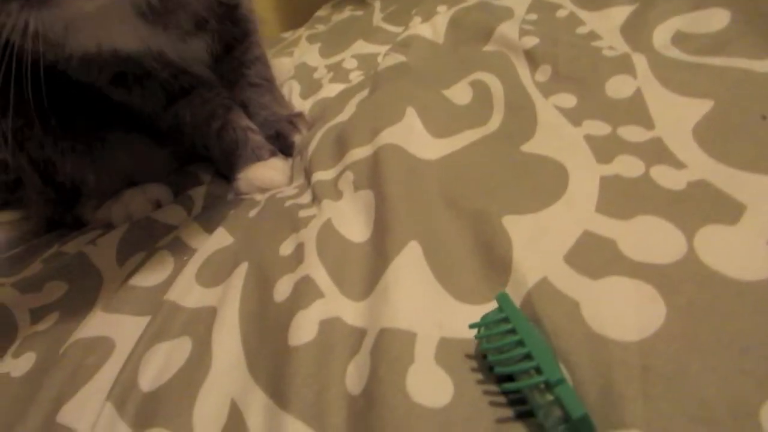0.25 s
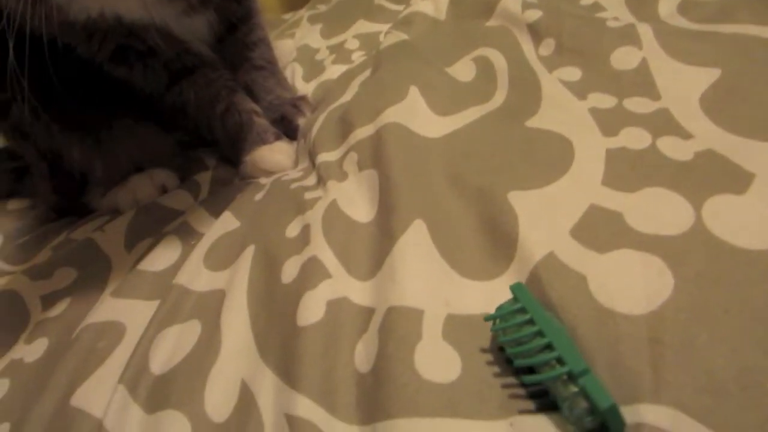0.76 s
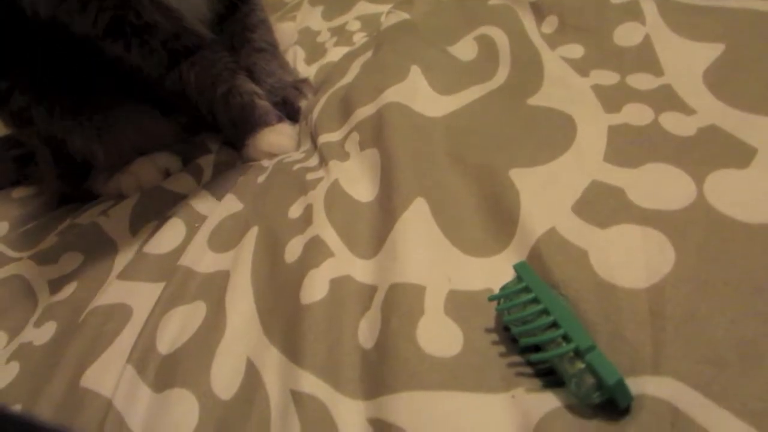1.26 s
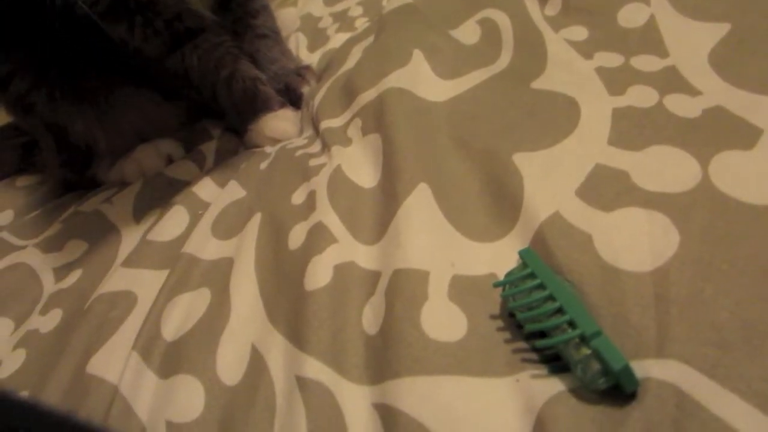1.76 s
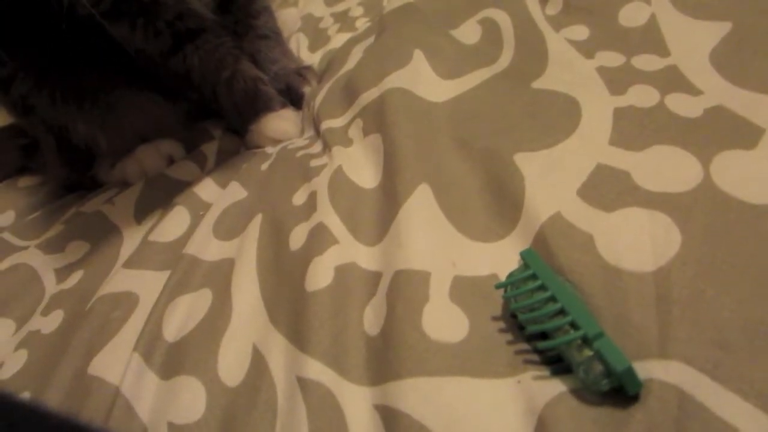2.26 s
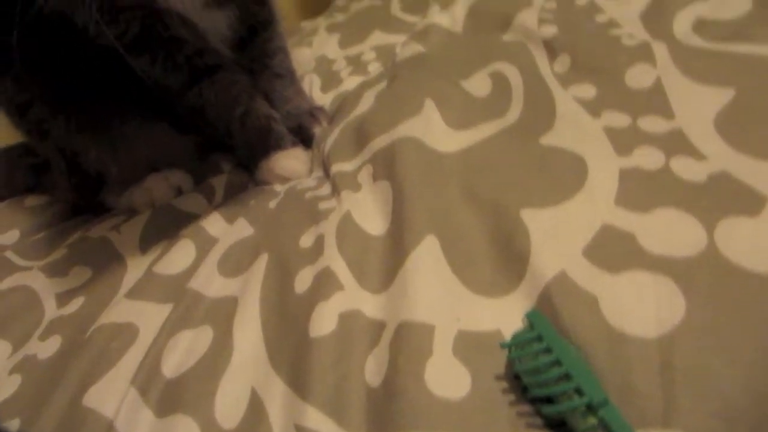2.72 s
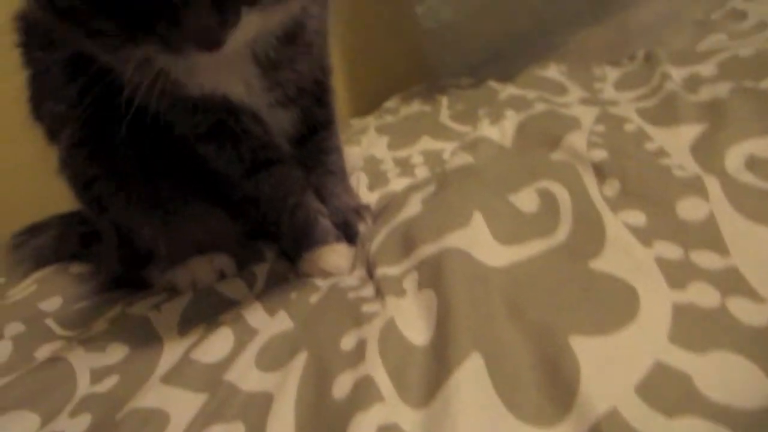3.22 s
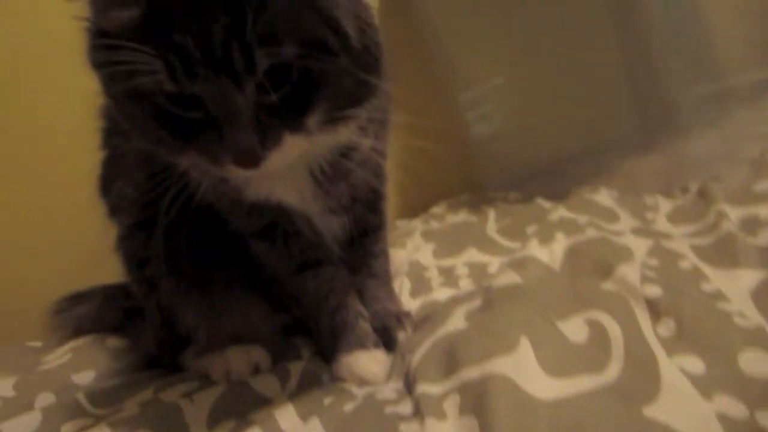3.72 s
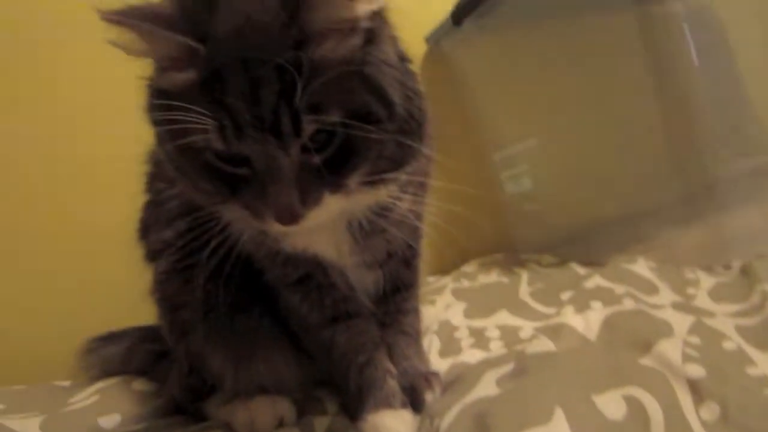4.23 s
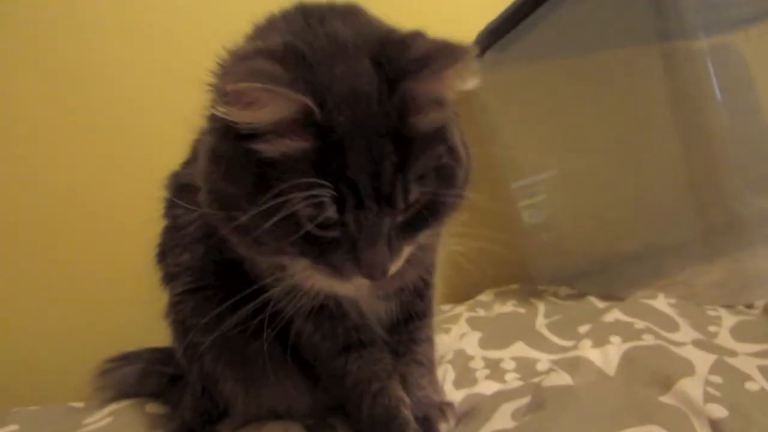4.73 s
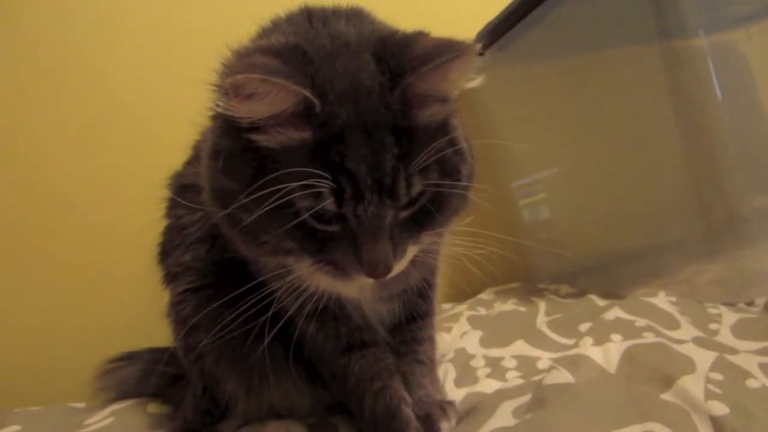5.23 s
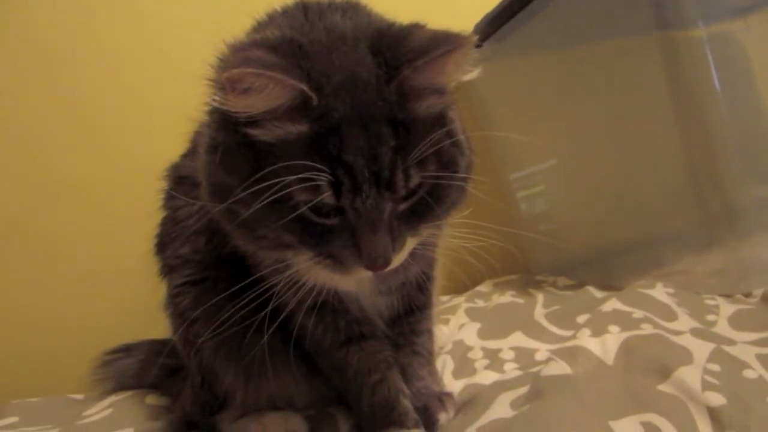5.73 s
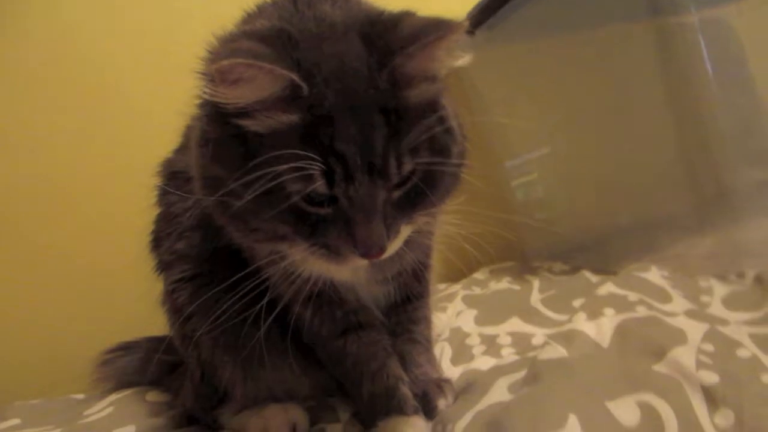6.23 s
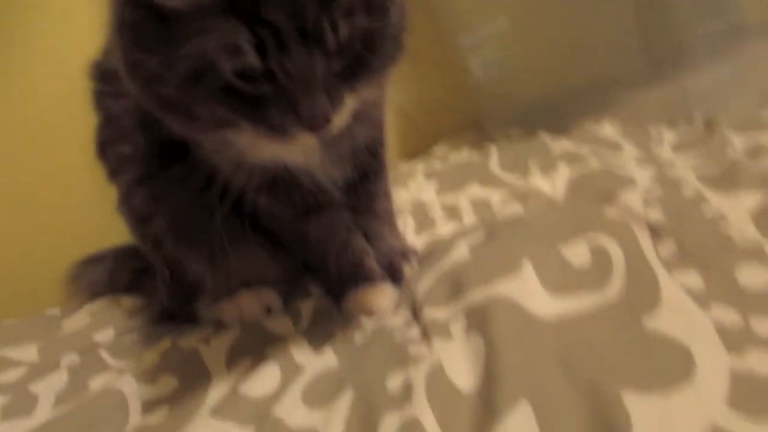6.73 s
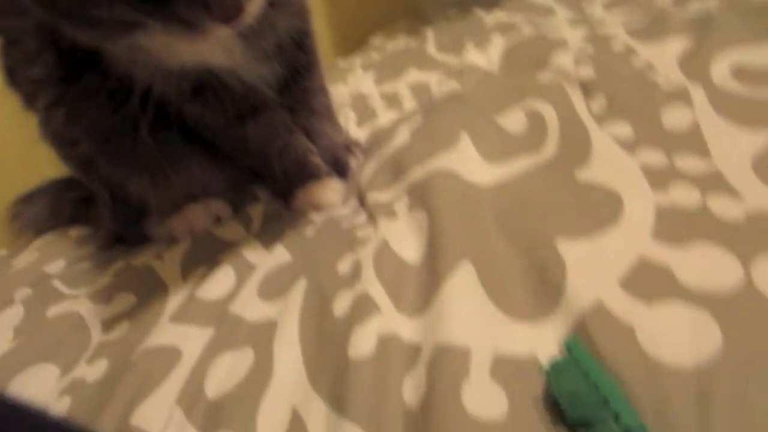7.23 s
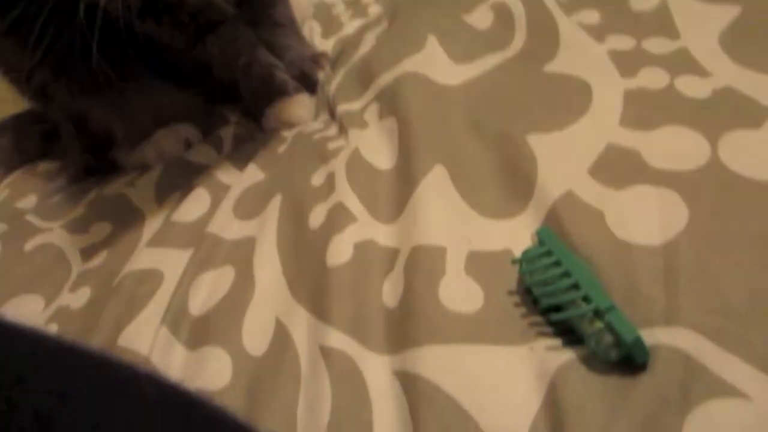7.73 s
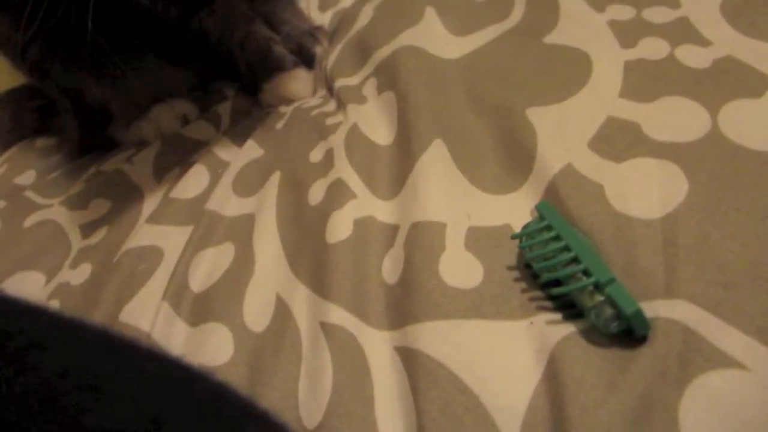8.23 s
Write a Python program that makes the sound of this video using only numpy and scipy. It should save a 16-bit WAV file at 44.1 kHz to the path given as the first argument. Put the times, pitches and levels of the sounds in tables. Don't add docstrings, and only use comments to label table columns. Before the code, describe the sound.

A small toy's vibration motor buzzes steadily on a soft bed, low and rattly, sagging slightly in pitch, with tiny camera handling clicks and thuds.

```python
import sys
import numpy as np
from scipy import signal
from scipy.fft import rfft, irfft, next_fast_len
from scipy.io import wavfile
from scipy.ndimage import map_coordinates

SR = 44100
rng = np.random.default_rng(int(sys.argv[2]) if len(sys.argv) > 2 else 0)


def to_wav(sig):
    pcm = np.clip(np.atleast_2d(sig), -1, 1) * 32767
    pcm = np.round(pcm).astype(np.int16)
    wavfile.write(sys.argv[1], SR, pcm.T)


def gain_from_db(level_db):
    decades = np.asarray(level_db, float) / 20
    return 10 ** decades


N = 373526
TIME_S = np.arange(N) / SR


def unit(x):
    return x / np.sqrt(np.mean(x ** 2) + 1e-20)


def hump(x, centre, width, height):
    return height * np.exp(-((x - centre) / width) ** 2)


def along(points, hz):
    f, v = np.transpose(points)
    return np.interp(np.log(hz + 1), np.log(f + 1), v)


def curves(rows):
    s, *columns = np.transpose(rows)
    return [np.interp(TIME_S, s, column) for column in columns]


def wobble(rate):
    knots = rng.standard_normal(int(N * rate / SR) + 4)
    return map_coordinates(knots, [np.arange(N) * rate / SR], order=1)


def filtered(x, response):
    n = x.shape[-1]
    m = next_fast_len(n + 8192)
    return irfft(rfft(x, m) * response(np.fft.rfftfreq(m, 1 / SR)), m)[..., :n]


def shaped_noise(spectrum):
    return filtered(rng.standard_normal(N), lambda hz: gain_from_db(along(spectrum, hz)))


def ringing(modes):
    def response(f):
        total = 0
        for k, (centre, width, db) in enumerate(modes):
            total = total + (-1) ** k * gain_from_db(db) * 1j * f * width / (centre ** 2 - f * f + 1j * f * width)
        return total
    return response


def pulses(at, size):
    tap = np.floor(at)[:, None] + np.arange(-7, 9)
    offset = tap - at[:, None]
    shape = np.sinc(offset) * np.cos(np.pi * offset / 16) ** 2
    place = np.clip(tap, 0, N).astype(int)
    return np.bincount(place.ravel(), (shape * size[:, None]).ravel(), N + 1)[:N]


# pitch_hz,
# lead_rad
LEAD_FACING = [(100, 0), (700, 0.24), (2200, -0.35), (7600, -2), (9200, -2.5), (11000, -2), (12200, -1.4),
               (13500, -0.5)]
LEAD_AWAY = [(100, 0), (700, 0.54), (2200, 0.44), (5500, -0.5), (6800, -3), (8200, -2.55), (9200, -3),
             (10500, -2.5), (12400, -2.5)]
# pitch_hz, level_db
SHADE = [(100, 0.8), (500, -0.6), (1200, 2), (3000, 0.5), (8000, 0), (12000, -6.5)]


def ports(x, lead=LEAD_FACING):
    side = np.array([[0.5], [-0.5]])
    return filtered(x, lambda hz: np.exp(1j * along(lead, hz) * side) * gain_from_db(along(SHADE, hz) * side))


# time_s, shaft_hz, shake_db
MOTOR = [(0, 151.5, -30.4), (.3, 150.3, -30.9), (.54, 149.95, -30.9), (.7, 150.3, -30.2),
         (1.2, 150.05, -29), (1.52, 148.9, -28.6), (2.0, 148.95, -28.1), (2.8, 148.5, -29),
         (3.2, 147.3, -30), (3.9, 146.6, -31.4), (4.35, 145.55, -32.4), (4.9, 145.4, -32.7),
         (5.35, 144.4, -32.9), (5.75, 144.2, -32.9), (6.28, 143.05, -33), (7.35, 142.8, -30.6),
         (7.98, 145, -29.6), (8.47, 144.8, -29.7)]
# time_s, share turned away from the toy (0-1)
AIM = [(0, 0), (.6, 0.036), (1.5, 0.082), (2.7, 0.062), (3.2, 0.68), (4, 0.71), (5.4, 0.64), (6.2, 0.75),
       (6.9, 0.65), (7.3, 0.54), (8.47, 0.47)]
# time_s, extra 2nd order level_db, extra 3rd order level_db
SETTLE = [
    (0, 4, 11),
    (.2, 3.5, 7),
    (.3, 3.5, 5),
    (.4, 0.5, -1),
    (.5, 0, 2),
]
# time_s, second_rad, third_rad
LEAN = [(0, 4.1, 2.5), (.3, 4, 1.9), (.5, 3.6, .1), (.9, 3.2, .1), (3, 3.1, .1), (6.2, 2.6, -.4),
        (8.47, 2.7, -.5)]
# multiple of the shaft, level_db
UPPER = [(1, 0), (2, -9), (3, -16), (4, -35), (5, -31), (6, -31), (7, -31.5), (8, -32.5), (9, -34.5),
         (10, -33.5), (11, -40), (12, -36), (13, -37), (14, -39.5), (15, -40), (16, -39), (17, -39.5),
         (18, -46), (19, -38), (20, -48.5), (21, -40), (22, -48), (23, -41), (24, -48.5), (25, -43.5),
         (26, -66), (27, -62), (28, -55)]
# pitch_hz, width_hz, lift_db
LIFTS = [(602.3, 5, 12), (717.3, 10.6, 6.5), (757.7, 4.4, 12), (917, 14, 5), (1007, 6.7, 4), (1031, 6.7, 5),
         (1146, 10.7, 9.5), (1320, 6.2, 3), (1430, 11, 1), (1927, 14, 2)]
# multiple of the shaft, time_s, half_length_s, level_db
SWELLS = [(4, 1.36, 0.2, 6.5), (4, 6.9, 0.55, 8), (6, 1.9, 0.22, 7.5), (7, 2.4, .5, 6), (7, 7.9, 0.36, 6),
          (7, 5.6, .4, -10.5), (8, 2.1, 0.29, 4), (9, 3.4, 1, 0.5), (9, 8.1, .3, 6), (10, 1.8, 1, -9),
          (10, 8.2, 0.52, 7), (10, 6.6, .3, 7.5), (11, 2.3, .4, 9.5), (11, 1.3, .2, 6.5),
          (12, 2.6, .4, 2.5), (13, 2.5, .35, 5), (14, 3.7, .3, 0.5), (14, 6.4, .5, 3), (15, 2, .5, 8.5),
          (15, 5.5, 0.22, 12.5), (16, 3.4, .5, 5.5), (16, 8.2, .3, 6.5), (17, 7, 0.35, 7.5),
          (17, 8.2, 0.36, 9), (5, 5.3, .3, -2.5), (6, 4, .25, 3.5), (6, 6.5, .2, 5), (18, 4.4, 0.18, 8.5),
          (18, 5.6, 0.17, 9), (19, 8, 0.29, 4.5), (15, 5.5, .25, -7), (9, 1.9, .3, 5.5), (5, 2.2, .4, -3),
          (8, 7.2, .2, -2.5), (8, 5.8, .3, -2.5), (5, 6.1, .2, 2.5), (19, 2.9, .3, 4), (20, 2.3, 0.33, 7),
          (21, 5.1, .3, 3.5), (21, 7.2, .3, 8), (23, 5.75, .35, 7.5), (25, 4.3, 0.22, 4)]


def upper_order(k, db, angle, shaft_hz):
    hz = k * shaft_hz
    for centre, width, lift_db in LIFTS:
        if abs(hz[0] - centre) < 200:
            db = db + hump(hz, centre, width, lift_db)
    for multiple, *swell in SWELLS:
        if round(multiple) == k:
            db = db + hump(TIME_S, *swell)
    db = db + 1.27 * wobble(2.486) + 1.72 * wobble(14)
    return gain_from_db(db) * np.cos(k * angle + 2.36 * wobble(1.218))


def shake(turns):
    angle = 2 * np.pi * turns
    shaft_hz, shake_db = curves(MOTOR)
    rock2_db, rock3_db = curves(SETTLE)
    lean2, lean3 = curves(LEAN)
    second_db = shake_db - 8.5 + hump(2 * shaft_hz, 292, 3.2, -2) + rock2_db
    third_db = shake_db - 22.5 + hump(3 * shaft_hz, 428, 9.6, 8.4) + rock3_db
    body = gain_from_db(shake_db) * np.cos(angle)
    body = body + gain_from_db(second_db) * np.cos(2 * angle + lean2)
    body = body + gain_from_db(third_db) * np.cos(3 * angle + lean3)
    upper = sum(upper_order(k, db, angle, shaft_hz) for k, db in UPPER if k > 3)
    upper_db = -52.5 - 2 * curves(AIM)[0] + 0.17 * rock3_db
    return np.sqrt(2) * body + gain_from_db(upper_db) * unit(upper)


# pitch_hz, width_hz, level_db
LOW_RING = [(6210, 1000, -3), (6990, 370, 2.5), (7540, 350, 2)]
HIGH_RING = [(7930, 250, -11), (8246, 210, -4.5), (8680, 190, -5), (10300, 1800, -12), (12400, 1000, -14.5)]


def brushes(turns):
    away, shaft_hz = curves(AIM)[0], curves(MOTOR)[0]
    low_db = -55.5 - 3 * away + 1.4 * wobble(4)
    high_db = -61.5 + 1.33 * (shaft_hz - shaft_hz.mean()) + hump(shaft_hz, 146, 1, 7.2)
    high_db = high_db + 1.8 * wobble(3) + hump(TIME_S, 8.2, 0.48, 2.3)

    half_turn = np.arange(1, int(2 * turns[-1]))
    second = half_turn % 2
    at = np.interp(half_turn / 2 + 0.0504, turns, np.arange(N))
    chance = rng.standard_normal((len(half_turn), 2))
    late_us = 35 + 7.7 * wobble(9.4)
    at = at + (second * late_us[at.astype(int)] + 4 * chance[:, 0]) * SR / 10 ** 6
    drift_db = 0.71 * wobble(20)[np.minimum(at, N - 1).astype(int)]
    size = np.where(second, -gain_from_db(-4.0), 1) * gain_from_db(0.8 * chance[:, 1] + drift_db)

    ticks = pulses(at, size)
    low = unit(filtered(ticks, lambda f: ringing(LOW_RING)(f) ** 2))
    high = unit(filtered(ticks, lambda f: ringing(HIGH_RING)(f) ** 2))
    return gain_from_db(low_db) * low + gain_from_db(high_db) * high


# pitch_hz, level_db per Hz
RATTLE = [(290, -21), (500, -4.5), (915, -7.5), (984, -8), (1020, -5.5), (1380, -7.5), (5480, -18.5),
          (7510, -24), (9000, -22.5), (11700, -43), (19800, -120)]


def rattle(turns):
    gate_db = 2.7 * np.cos(4 * np.pi * turns) + 0.75 * np.cos(2 * np.pi * turns)
    gate = gain_from_db(gate_db + 1.23 * wobble(30) + 1.1 * wobble(600))
    grains = gate * rng.standard_normal((2, N))
    mid, side = filtered(grains, lambda hz: gain_from_db(along(RATTLE, hz)))
    noise = unit(ports(mid) + 0.61 * side * [[1], [-1]])
    shake_db = curves(MOTOR)[1]
    level_db = -53 + 0.66 * (shake_db - shake_db.mean()) + 0.34 * curves(SETTLE)[1]
    level_db = level_db + hump(TIME_S, 2.57, 0.18, 0.5)
    return gain_from_db(level_db) * noise


# time_s, peak_db, tilt_db, t60_s
CREAKS = [
    (0.975, -20, -0.5, .0018),
    (0.9765, -30, -6, .002),
    (0.9774, -36, -6.5, 0.0026),
    (2.421, -41, -14, 0.0066),
    (2.685, -54, 6, .01),
    (6.282, -46.5, 3, 0.044),
    (6.70, -48.5, 1, 0.034),
]
# pitch_hz, width_hz, level_db
CASE = [(1330, 350, 7), (2300, 460, 0), (3590, 300, 6.5), (4540, 350, 2.5), (5000, 260, 6),
        (6360, 450, 2.5), (7400, 350, 3), (8400, 400, -2), (9450, 700, -4), (11850, 1000, -8),
        (14600, 1200, -11)]
# pitch_hz, lead_rad
CASE_LEAD = [(1000, 0.12), (5000, -0.47), (15000, -1.9)]


def case_creaks():
    creaks = np.zeros((2, N))
    short_s = np.arange(2048) / SR
    n = len(short_s)
    for s, peak_db, tilt_db, t60 in CREAKS:
        scrape = rng.standard_normal(n) + 0.87 * rng.standard_normal((2, n))
        burst = gain_from_db(-60 * short_s / t60) * scrape
        burst[:, 0] = 7.2
        burst = burst + gain_from_db(tilt_db) * np.diff(burst, prepend=0)
        burst = filtered(burst, ringing(CASE))
        peak = np.abs(burst).max(axis=1, keepdims=True)
        creaks[:, round(s * SR):][:, :n] += gain_from_db(peak_db) * burst / peak
    left, right = creaks
    return np.array([ports(left, CASE_LEAD)[0], ports(right, CASE_LEAD)[1]])


# time_s, peak_db, pitch_hz, length_s
BUMPS = [(0.603, -50, 97, 0.051), (.91, -52, 44.5, 0.069), (2.328, -50, 55.5, 0.064), (2.8, -56, 50.4, .07),
         (3.13, -52, 65, 0.076), (3.95, -54.5, 318, 0.069), (6.353, -50, 65, .05), (6.481, -47, 216, 0.02),
         (6.505, -42, 310, 0.063), (6.512, -43.5, 96, 0.076), (6.51, -46, 167, 0.05),
         (6.598, -49, 59.6, 0.032), (6.694, -51, 74, .07), (6.82, -55, 45, .06), (7.03, -55, 59.95, 0.075),
         (8.41, -53.5, 82, 0.055)]


def hand_bumps():
    bumps = np.zeros(N)
    for s, peak_db, hz, length in BUMPS:
        bumps += hump(TIME_S, s, length / 2, gain_from_db(peak_db)) * np.sin(2 * np.pi * hz * (TIME_S - s))
    return bumps


# pitch_hz, level_db per Hz
TOP_HISS = [(9000, -120), (9500, -4.5), (10300, 0), (11200, -3), (11800, -12), (13000, -11), (13600, -6.5),
            (15400, -6.5), (15800, -120)]
# time_s, level_db
TOP_HISS_LEVEL = [(0, -93), (2.6, -87), (2.95, -73), (4.3, -71.5), (5.5, -74.5), (6.3, -71), (6.9, -72),
                  (7.4, -76), (8.47, -77)]


def top_hiss():
    return gain_from_db(curves(TOP_HISS_LEVEL)[0] + 1.3 * wobble(3.9) + 1.8 * wobble(25)) * unit(shaped_noise(TOP_HISS))


HUM_HZ = [120, 237, 415, 538, 1343]
# level_db, unsteadiness_db
HUM = [(-60.5, 1.5), (-53, 2), (-73.5, 3), (-65, 1.8), (-62, .5)]


def appliances():
    total = np.zeros(N)
    for hz, (db, shaky_db) in zip(HUM_HZ, HUM):
        level_db = db + 2.5 + shaky_db * wobble(5)
        if hz > 1000:
            level_db = level_db + hump(TIME_S, 1.1, 0.15, 4.1)
        total += gain_from_db(level_db) * np.sin(2 * np.pi * hz * TIME_S + 0.19 * shaky_db * wobble(6))
    return total


def fan():
    hz = 268.8 + hump(TIME_S, 5.9, 0.7, 3.9)
    level_db = -51 + 1.1 * wobble(2.5) + 2.5 + 1.5 * wobble(8)
    return gain_from_db(level_db) * np.sin(2 * np.pi * np.cumsum(hz) / SR + 0.99 * wobble(7.4))


WHINE_HZ = [15734, 15747.5]


def screen_whine():
    whine = sum(gain_from_db(-71.5 - 19 * k) * np.sin(2 * np.pi * hz * TIME_S) for k, hz in enumerate(WHINE_HZ))
    return whine * [[1 - 0.33], [1 + 0.33]]


# pitch_hz, level_db per Hz
AIR = [(15, -51), (30, -31.5), (60, -23.5), (110, -17), (290, -17.5), (380, -23), (700, -36.5), (1400, -33),
       (3500, -41.5), (5000, -69), (8750, -56), (9050, -52), (11000, -40), (13000, -43.5), (15700, -47)]
# pitch_hz, correlation (-1 to 1)
ALIKE = [(60, .99), (300, 1), (640, 1), (1400, 0.67), (3100, 0.89), (5000, -0.015), (9000, -0.965),
         (14000, -0.99)]


def room_air():
    def split(hz):
        turn = np.arccos(np.clip(along(ALIKE, hz), -1, 1)) / 2
        return gain_from_db(along(AIR, hz)) * [np.cos(turn), np.sin(turn)]
    mid, side = filtered(rng.standard_normal((2, N)), split)
    return gain_from_db(-52.5 + 0.36 * wobble(3)) * unit(np.array([mid + side, mid - side]))


def scene():
    turns = np.cumsum(curves(MOTOR)[0] + 0.15 * wobble(40)) / SR
    motor = shake(turns) + brushes(turns)
    away = np.clip(curves(AIM)[0], 0, 1)
    toy = (1 - away) * ports(motor) + away * ports(motor, LEAD_AWAY) + rattle(turns)
    hand = case_creaks() + hand_bumps()
    room = top_hiss() + appliances() + fan() + screen_whine() + room_air()
    return toy + hand + room


def roll_off(x):
    return signal.sosfilt(signal.butter(12, 16500, fs=SR, output="sos"), x)


def record(dry):
    mix = filtered(dry, lambda hz: hz < 15850)
    return roll_off(mix)


dry = scene()
out = record(dry)
to_wav(out)
```